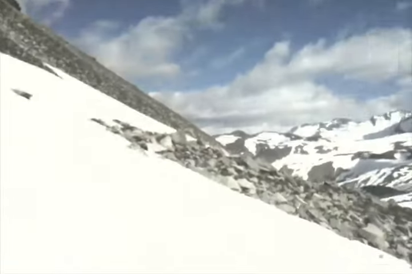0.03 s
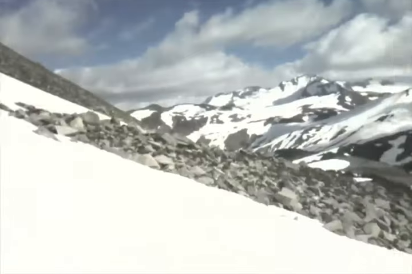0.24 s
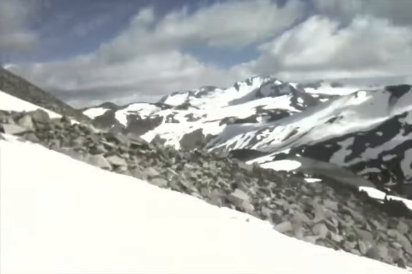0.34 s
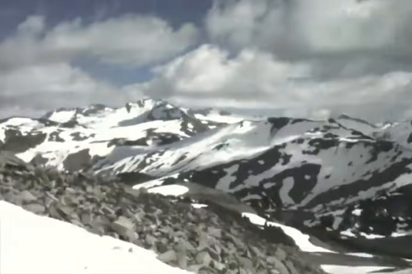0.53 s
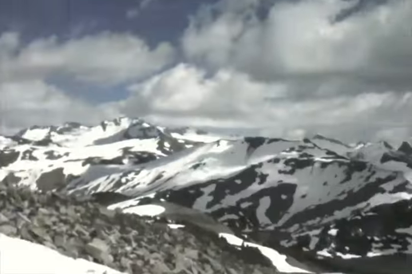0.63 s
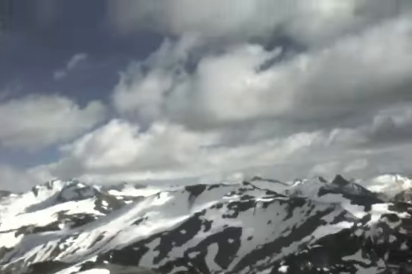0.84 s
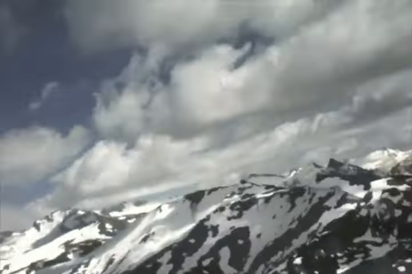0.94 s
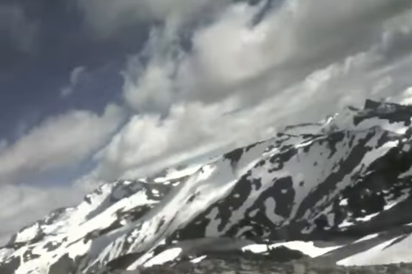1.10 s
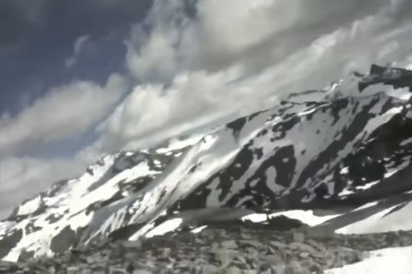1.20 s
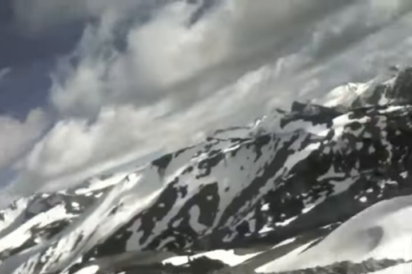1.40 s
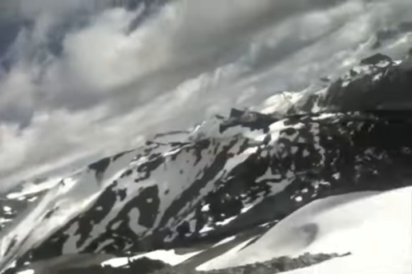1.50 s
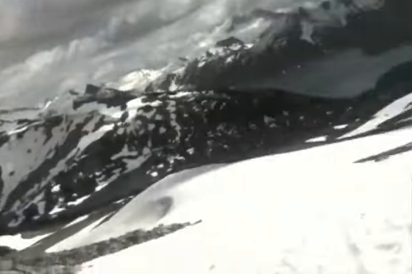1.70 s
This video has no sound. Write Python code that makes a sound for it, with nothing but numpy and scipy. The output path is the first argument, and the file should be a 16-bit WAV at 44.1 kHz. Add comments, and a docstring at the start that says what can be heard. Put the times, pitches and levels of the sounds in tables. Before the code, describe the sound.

A boot crunches into snow as a short gust rumbles on the microphone. The foot then slides twice with a grainy hiss while small stones knock and rattle, close by on an open mountain slope.

```python
"""A gust of wind rumbles, snow crunches under a boot, then the foot slides twice and stones knock.
The boots are close by, on a mountain slope in open air with no echo. The rumble is swirling air
hitting the microphone. The crunch and the hiss of the slides are thousands of tiny clicks, one for
each snow grain. Thin ice snaps in bright bursts, and each small stone cracks, rings and rattles."""
import sys
import numpy as np
from scipy import signal
from scipy.fft import rfft, irfft
from scipy.io import wavfile
from scipy.ndimage import uniform_filter1d

SR = 44100
rng = np.random.default_rng(int(sys.argv[2]) if len(sys.argv) > 2 else 0)


def dump(signal):
    """Clip the signal to [-1, 1] and save it as 16-bit WAV at the path in sys.argv[1]."""
    limited = np.clip(np.atleast_2d(signal).T, -1, 1)
    pcm = np.round(limited * 32767).astype(np.int16)
    wavfile.write(sys.argv[1], SR, pcm)


N = 77175  # 1.75 s


def undb(db):
    """Turn decibels into a number to multiply by."""
    return 10 ** (np.asarray(db) / 20)


def unit(x):
    """Scale x so that its average strength (rms) is 1."""
    return x / np.sqrt(np.mean(x ** 2))


def peak(x, db):
    """Scale x so that its highest peak is at db."""
    return x * undb(db) / np.abs(x).max()


def add(out, start_s, x):
    """Mix x into out, beginning at start_s."""
    i = max(int(start_s * SR), 0)
    out[i:i + len(x)] += x[:N - i]


def curve(rows):
    """A volume curve that joins (time [s], level [dB]) points."""
    times, db = np.array(rows).T
    return undb(np.interp(np.arange(N) / SR, times, db))


def fade(t, fade_s):
    """A volume curve that falls by 60 dB in fade_s seconds."""
    return np.exp(-np.log(1000) * t / fade_s)


def below(x, hz):
    """Keep the part of x that is lower than hz."""
    return signal.sosfiltfilt(signal.butter(3, hz, fs=SR, output="sos"), x)


def colour(x, points, skirt_db=24):
    """Shape the tone by (frequency [Hz], level [dB]) points; the result has strength 1."""
    hz, db = np.array(points).T
    octave = np.log2(np.maximum(np.fft.rfftfreq(2 * N, 1 / SR), 1))
    # past either end, the level drops by skirt_db an octave for two octaves
    outside = np.abs(octave - np.clip(octave, np.log2(hz[0]), np.log2(hz[-1])))
    gain = undb(np.interp(octave, np.log2(hz), db) - skirt_db * np.minimum(outside, 2))
    # make the filter ring only after a click, never before it
    cepstrum = irfft(np.log(gain))
    cepstrum[1:N] *= 2
    cepstrum[N + 1:] = 0
    response = np.exp(rfft(cepstrum))
    return unit(irfft(rfft(x, 2 * N) * response)[:N])


def grains(per_s, spread_db):
    """Random clicks, many small and a few large."""
    happens = rng.random(N) < per_s / SR
    size = np.minimum(rng.exponential(size=N), 5)
    sign = rng.choice([-1, 1], N)
    return happens * sign * undb(spread_db * size)


def air():
    """A faint, steady hiss lies behind everything."""
    # tone of the hiss (frequency [Hz], relative level [dB])
    tone = [(35, -41), (60, 1), (112, 5), (226, -21), (443, 10.5), (688, -1), (910, -14), (1380, -17),
            (1830, -42), (2840, -17), (3120, -9), (4120, -12), (6120, -10.5), (12300, -15.5), (15500, -26)]
    return undb(-69) * colour(rng.standard_normal(N), tone)


def wind():
    """Swirls of air rumble on the microphone, louder and brighter as the gust grows; a few pop."""
    # strength of the gust (time [s], relative level [dB])
    gust_levels = [(0.0, -41.5), (0.024, -50), (0.048, -66), (0.076, -48), (0.16, -48), (0.242, -35.5),
                   (0.268, -43), (0.296, -44), (0.33, -29.5), (0.394, -26.5), (0.418, -29), (0.476, -28.5),
                   (0.52, -34), (0.54, -32), (0.57, -40.5), (0.74, -56.5), (0.76, -48.5), (0.798, -64.5),
                   (0.872, -61.5), (0.934, -78), (0.95, -61), (1.296, -61), (1.324, -73), (1.544, -63),
                   (1.696, -71), (1.75, -70)]
    # tone of the rumble (frequency [Hz], relative level [dB])
    tone = [(24, -55), (40, -18), (65, -27), (145, 1.5), (193, -1.5), (301, -7.5), (371, -10.5),
            (457, -19.5), (514, -17), (563, -23.5), (617, -21.5), (900, -34.5), (1170, -61), (1980, -120)]
    # single swirls that pop (time [s], peak level [dB], pitch [Hz])
    pops = [(0.075,-36,162.5),(.218,-32,352),(0.237,-29.5,189),(0.385,-17.5,219),(0.4741,-23,298),(0.754,-40.5,125),(1.012,-49.5,131)]
    gust = curve(gust_levels)
    rumble = colour(grains(per_s=600, spread_db=2.5), tone, skirt_db=63)
    # even out the rumble over 16 ms, so the gust sets its loudness
    window = int(0.016 * SR)
    power = uniform_filter1d(uniform_filter1d(rumble ** 2, window), window)
    rumble = rumble / np.sqrt(power + 0.021)
    large_swirls = below(rumble, hz=320)
    small_swirls = (rumble - large_swirls) * (gust / undb(-28.5)) ** 0.49
    out = undb(-0.5) * gust * (large_swirls + small_swirls)
    t = np.arange(SR // 10) / SR
    for start_s, db, hz in pops:
        cycles = hz * t
        swell = cycles ** 2 * np.exp(-np.pi * cycles / 1.13)  # lasts only a few waves
        add(out, start_s, peak(np.sin(2 * np.pi * cycles) * swell, db))
    return out


def crumble(spread_db=4, fit_s=0.009):
    """Snow gives way in small fits, so its volume jumps up and down at random."""
    wobble = uniform_filter1d(rng.standard_normal(N), int(fit_s * SR))
    return undb(spread_db * unit(wobble))


def snow_crunch():
    """Snow grains break under the boot's weight; each band of pitch crumbles on its own."""
    # snow packing under the boot (time [s], relative level [dB])
    step_levels = [(0,-66.5),(.25,-67.5),(.285,-48.5),(.32,-48),(.385,-46),(.47,-50),(.495,-57.5),(.52,-54.5),(.555,-40),(.61,-45.5),(.66,-51.5),(.70,-55.5),(.73,-50.5),(.765,-51),(.79,-49),(.815,-53.5),(.86,-48.5),(.95,-44),(1.1,-83.5)]
    # tone of breaking grains (frequency [Hz], relative level [dB])
    tone = [(410, -36.5), (700, -3.5), (797, -3.5), (1020, -1.5), (1600, -0.5), (2000, 1), (2110, -9),
            (2280, -1), (2430, -8.5), (3820, -9.5), (4410, -11.5), (5150, -9), (5570, -17.5), (7220, -11),
            (7900, -15), (9720, -9), (10500, -9), (12900, -15.5), (15500, -25)]
    rest = colour(grains(per_s=16000, spread_db=2), tone, skirt_db=2)
    crunch = np.zeros(N)
    for hz in np.linspace(1500, 13500, num=9):
        band = below(rest, hz)
        rest = rest - band
        crunch += band * crumble()
    return undb(-1) * curve(step_levels) * unit(crunch + rest)


def ice_snaps():
    """A thin crust of ice snaps in short bursts of noise, each around its own pitch."""
    # snaps of the crust (time [s], peak level [dB], pitch [Hz], filter width [Hz])
    snaps = [(0.08,-43.5,5200,9200),(.112,-46.5,6540,11100),(0.245,-51,6200,5000),(0.338,-43,7500,5060),(.341,-47,12700,1000),(.386,-38.5,12400,1200),(0.461,-38.5,5560,7950),(0.528,-45,9000,9000),(.548,-39.5,5000,1500),(.554,-35.5,4650,1490),(.659,-43,7700,1800),(.669,-44,8000,5000),(0.825,-40.5,8050,6000),(.888,-32,12500,2500),(0.887,-37.5,8300,700),(0.9171,-30,11070,700)]
    rise_s = 0.0013
    out, t = np.zeros(N), np.arange(SR // 20) / SR
    for start_s, db, hz, width in snaps:
        burst = rng.standard_normal(len(t)) * fade(t, fade_s=0.022) * (1 - np.exp(-t / rise_s))
        b, a = signal.iirpeak(hz, hz / width, fs=SR)
        snap = signal.lfilter(b, a, signal.lfilter(b, a, burst))
        add(out, start_s, peak(snap, db))
    return out


def snow_spray(levels, tone):
    """A dense stream of snow grains blurs into a hiss, silent until the first time in levels."""
    started = np.arange(N) / SR > levels[0][0]
    return curve(levels) * started * colour(grains(per_s=33000, spread_db=1.5), tone)


def boot_slides():
    """The boot slides through snow; then a sudden scuff throws up a lighter, thinner spray."""
    # snow moved by the slide and by the scuff (time [s], relative level [dB])
    slide_levels = [(.84,-48),(.875,-46.5),(.91,-38),(.935,-45),(.96,-39.5),(1.02,-37.5),(1.10,-39),(1.19,-44),(1.25,-47.5),(1.32,-58.5),(1.39,-61),(1.47,-43),(1.49,-52.5),(1.55,-49),(1.61,-46.5),(1.645,-54.5),(1.68,-63.5),(1.75,-63)]
    scuff_levels = [(1.383,-71),(1.393,-39.5),(1.41,-41.5),(1.44,-43.5),(1.465,-44),(1.49,-54.5),(1.53,-50),(1.57,-54.5),(1.61,-48.5),(1.645,-53.5),(1.68,-60),(1.75,-82)]
    # tone of each hiss (frequency [Hz], relative level [dB])
    slide_tone = [(88, -32), (150, -9), (189, -7), (217, -1), (332, 5), (396, -6), (453, -1.5), (530, 0),
                  (643, -3.5), (1020, -1.5), (1220, -4), (1400, 2.5), (1760, 3), (2760, -8.5), (3830, -1),
                  (4310, -5), (5130, -1), (5650, -5.5), (7000, 0), (8010, -5), (9180, -1), (12500, -4.5),
                  (15500, -14.5)]
    scuff_tone = [(150, -64), (250, -31), (474, -21), (669, -25), (897, -12.5), (1100, -21), (1180, -19),
                  (1410, -15), (1670, -11.5), (1850, -9.5), (2530, -9.5), (3220, -8.5), (4710, -3),
                  (5890, -9.5), (6770, -0.5), (7900, -7.5), (10100, -4), (13700, -12), (15500, -22)]
    slide = snow_spray(slide_levels, slide_tone)
    scuff = snow_spray(scuff_levels, scuff_tone)
    return undb(-1) * slide + undb(1) * scuff


def stone_ring(t, hz, brightness, contact_s):
    """A stone bedded in snow rings only briefly; no two stones have quite the same tones."""
    # tones of a stone (pitch [times the main pitch], relative level [dB], fade time [s])
    tones = [(.68,-11.5,0.0056),(1,0.5,0.011),(1.2,-3.5,0.013),(1.52,-9,0.015),(2.05,-13.5,0.0094),(2.5,-25.5,0.0086),(3.7,-31,0.0064)]
    ring = np.zeros(len(t))
    for k, (ratio, db, fade_s) in enumerate(tones):
        pitch = hz * ratio * (1 + 0.025 * rng.standard_normal())
        gain = undb(db + brightness * np.log2(ratio))
        ring += (-1) ** k * gain * fade(t, fade_s) * np.sin(2 * np.pi * pitch * t)
    return ring * (1 - np.exp(-(t / contact_s) ** 2))


def stone_knocks():
    """Stones meet with a gritty crack, ring, and rattle briefly as they settle."""
    # knocks (time [s], peak level of the ring [dB], main pitch [Hz], brightness [dB per octave])
    knocks = [(.002,-40,2250,3.5),(0.013,-40,1860,-1),(0.0487,-53,2250,-29),(0.076,-45.5,1620,0),(0.1113,-37.5,1830,0),
              (0.384,-31,1510,-2.5),(.417,-38,1510,-6),(0.5296,-37,1680,13),(.549,-39,1490,13),(.556,-34.5,1370,-9),(0.625,-35.5,1650,-9),(0.6573,-38.5,1510,4),
              (0.8584,-15.5,1474,-1.5),(0.866,-31,1700,11),(0.8822,-19.5,1703,7.5),(.889,-30.5,1400,-34),(0.9188,-25.5,1350,-0.5),(.9465,-27.5,1370,2),(0.9503,-28,1480,13),
              (.997,-30,990,12),(1.011,-31.5,1006,-1),(1.049,-37.5,920,-1.5),(1.1224,-28,1600,-11),(1.132,-33,1480,3),(1.1792,-26,1700,0.5),(1.1868,-30,1290,-4),(1.213,-38,1150,-9),
              (1.2598,-26.5,1460,5.5),(1.288,-41,1200,-22),(1.2973,-37,1380,1),(1.4559,-31.5,1450,-3),(1.546,-40.5,610,-6),(1.703,-51.5,1770,-19)]
    contact_s, rattle_rise_s = 0.00025, 0.0028
    out, t = np.zeros(N), np.arange(SR // 20) / SR
    for start_s, db, hz, brightness in knocks:
        chatter = rng.standard_normal(len(t)) * fade(t, fade_s=0.069)
        chatter *= np.minimum(t / rattle_rise_s, 1) ** 2
        grit = rng.standard_normal(len(t)) * fade(t, fade_s=0.015) * (1 - np.exp(-t / contact_s))
        crack = below(grit, hz=5200)
        crack = crack - below(crack, hz=1110)  # the crack has no bass
        crack_db = db - 13 + 1.07 * brightness  # bright knocks crack harder
        ring = peak(stone_ring(t, hz, brightness, contact_s), db)
        rattle = signal.fftconvolve(ring, chatter)  # each tiny bump rings the stone again
        add(out, start_s, ring + peak(crack, crack_db))
        add(out, start_s, peak(rattle, db - 10))
    return out


def scene():
    """Mix the faint hiss, wind, snow, stones and ice into one channel."""
    return (air() + wind() + snow_crunch() + boot_slides() + stone_knocks() + ice_snaps())[None]


def record(dry):
    """The hand-held camera thins the deep bass and cuts the highest treble."""
    low_cut_hz, top_hz = 59.5, 15600
    thin = signal.sosfilt(signal.butter(2, low_cut_hz, "high", fs=SR, output="sos"), dry)
    return signal.sosfilt(signal.ellip(10, .2, 80, top_hz, fs=SR, output="sos"), thin)


dry = scene()
out = record(dry)
dump(out)
```